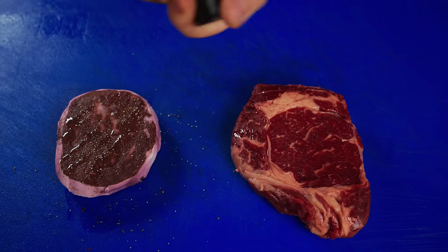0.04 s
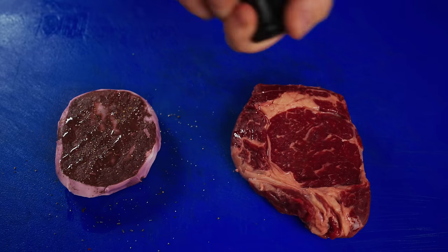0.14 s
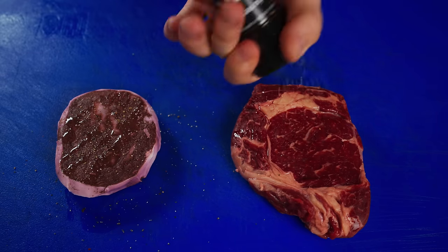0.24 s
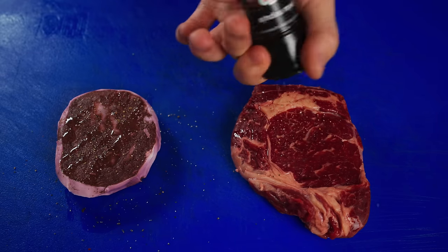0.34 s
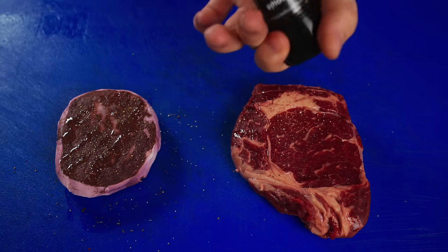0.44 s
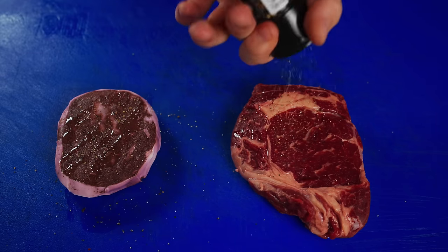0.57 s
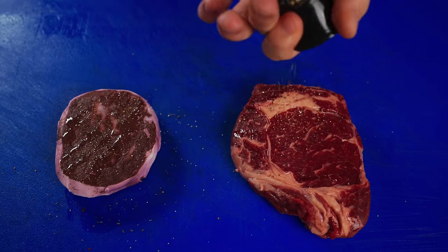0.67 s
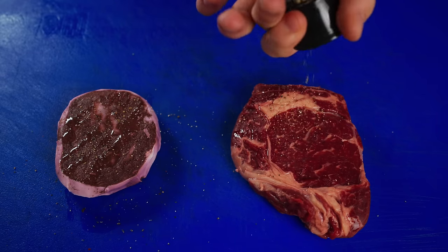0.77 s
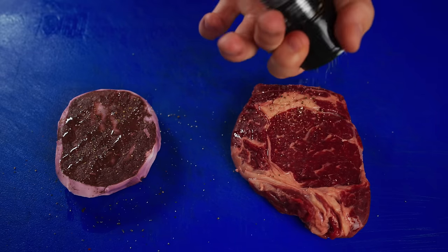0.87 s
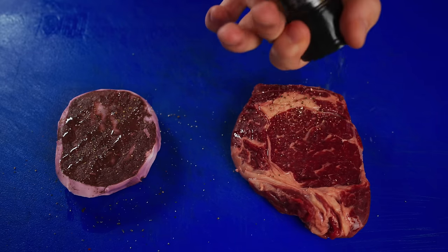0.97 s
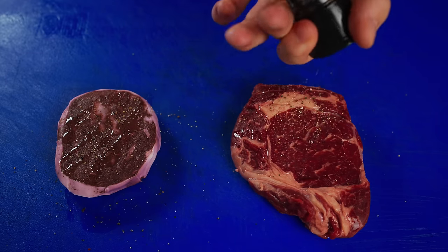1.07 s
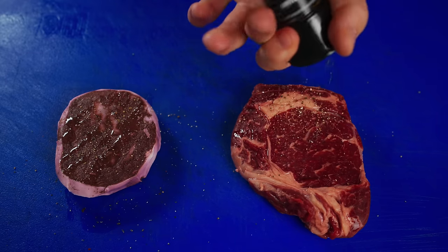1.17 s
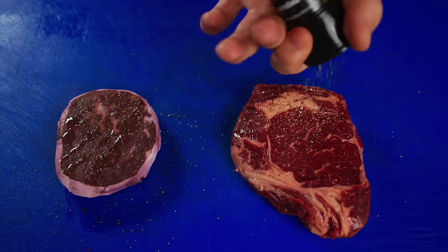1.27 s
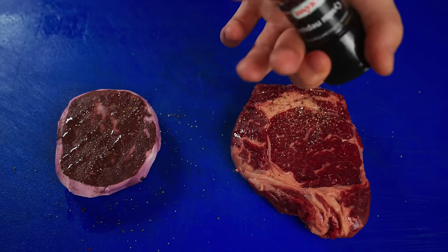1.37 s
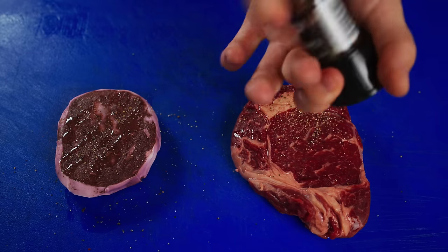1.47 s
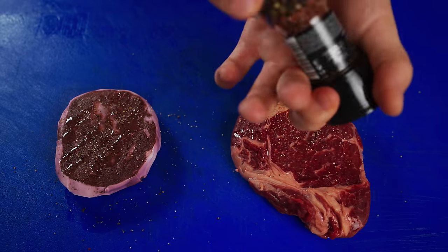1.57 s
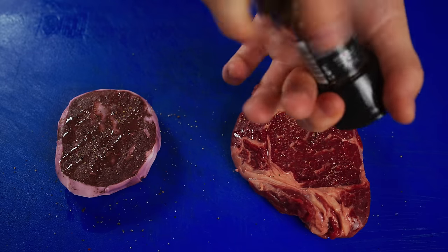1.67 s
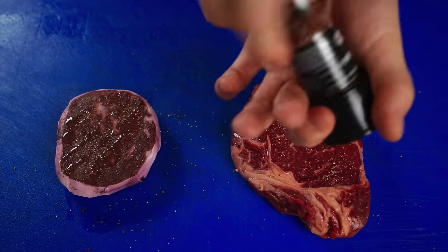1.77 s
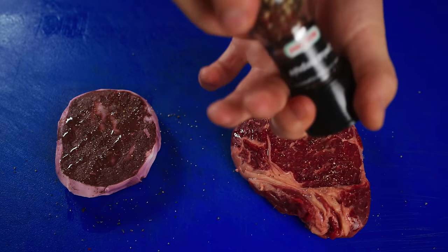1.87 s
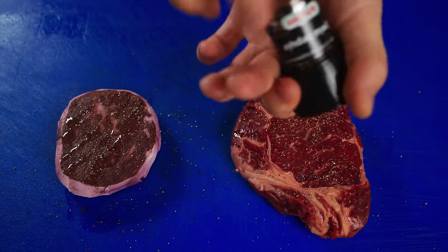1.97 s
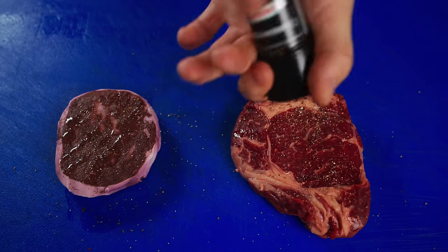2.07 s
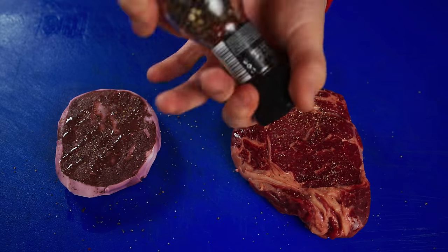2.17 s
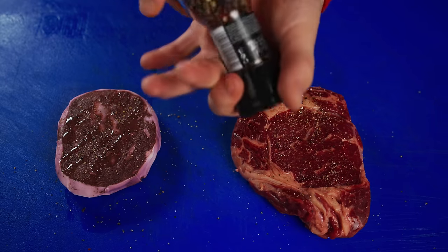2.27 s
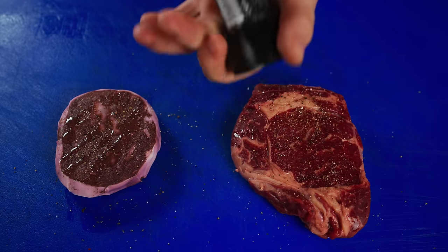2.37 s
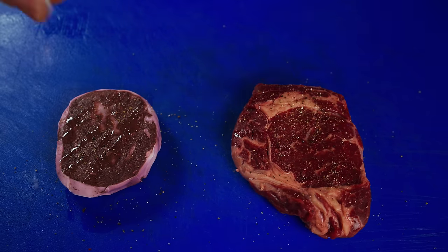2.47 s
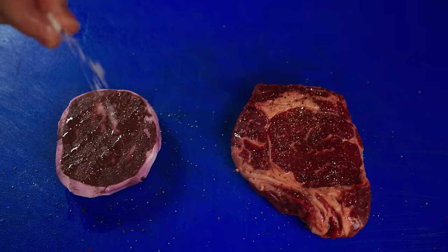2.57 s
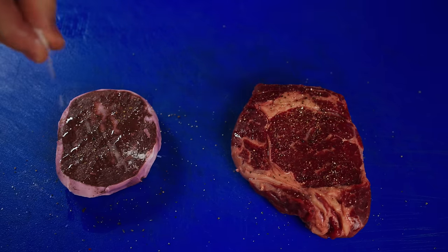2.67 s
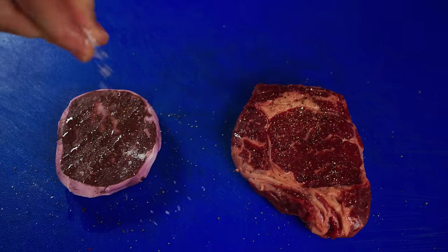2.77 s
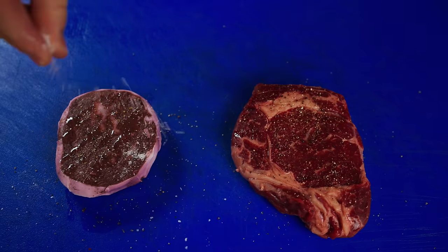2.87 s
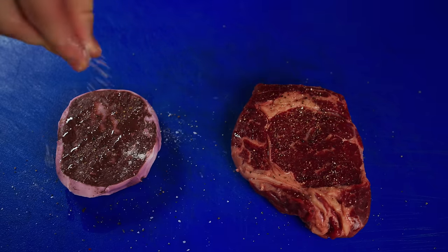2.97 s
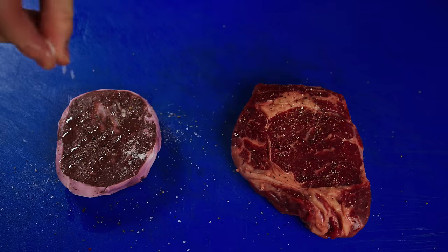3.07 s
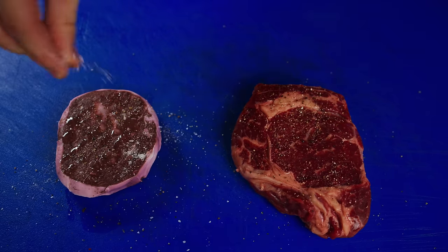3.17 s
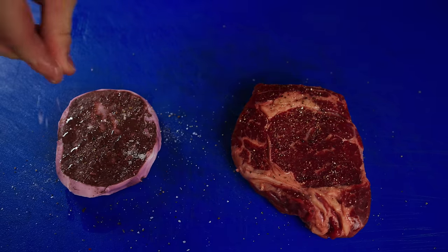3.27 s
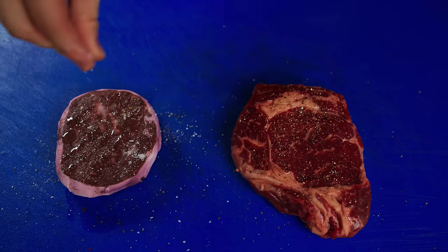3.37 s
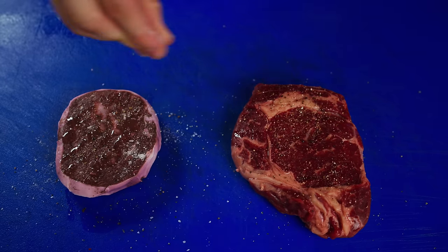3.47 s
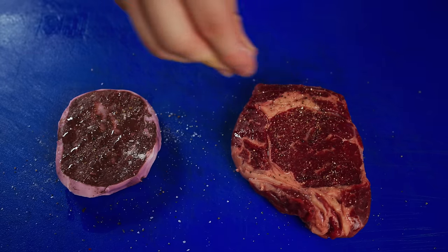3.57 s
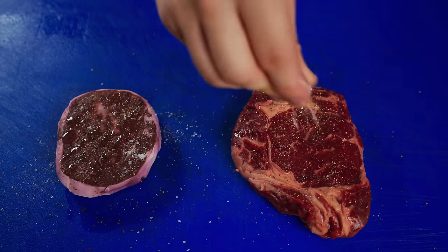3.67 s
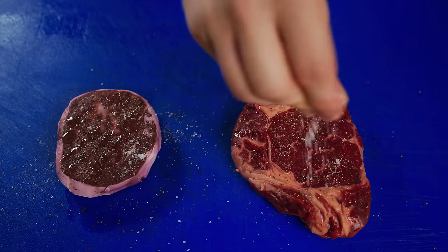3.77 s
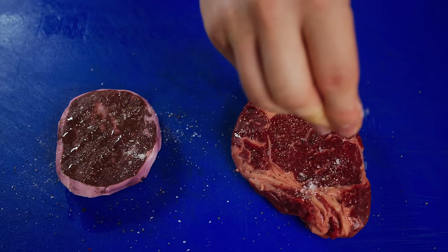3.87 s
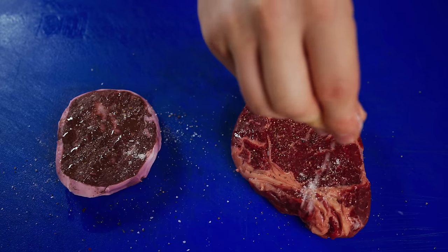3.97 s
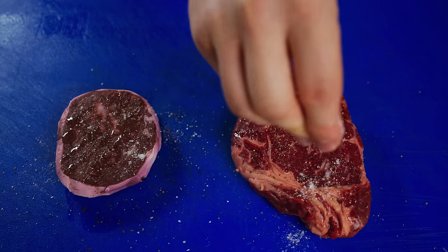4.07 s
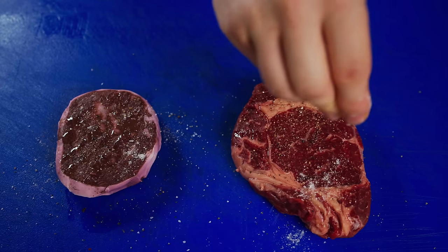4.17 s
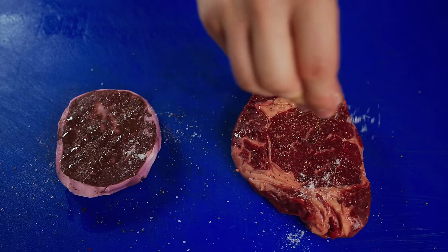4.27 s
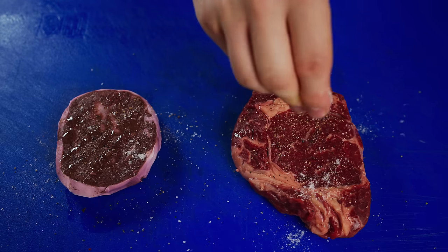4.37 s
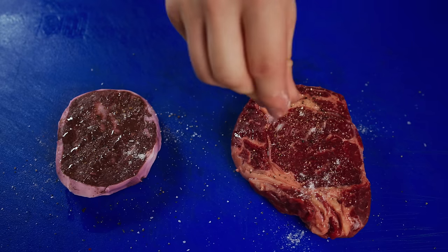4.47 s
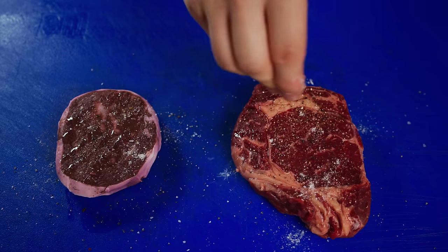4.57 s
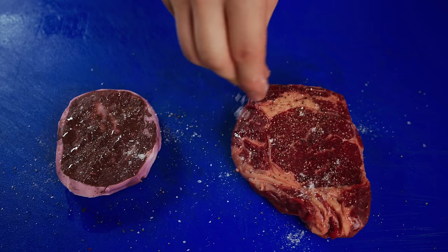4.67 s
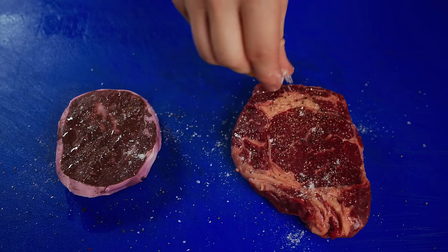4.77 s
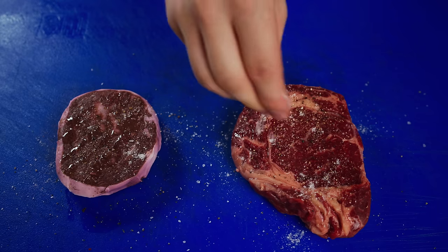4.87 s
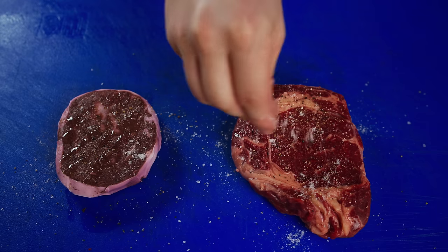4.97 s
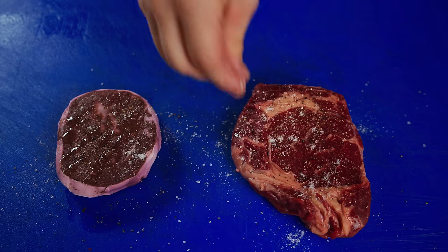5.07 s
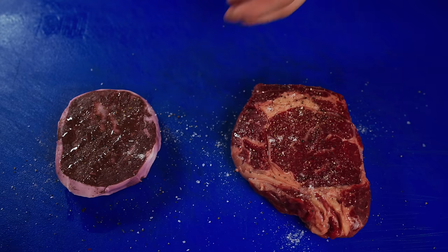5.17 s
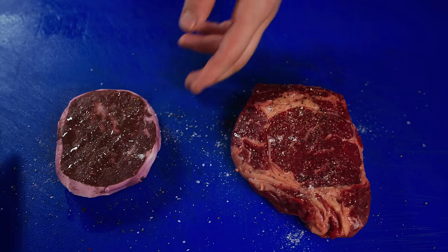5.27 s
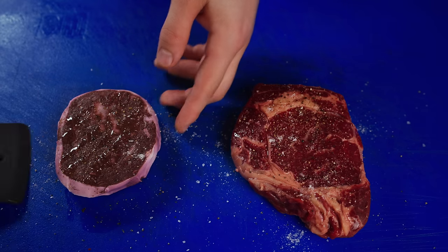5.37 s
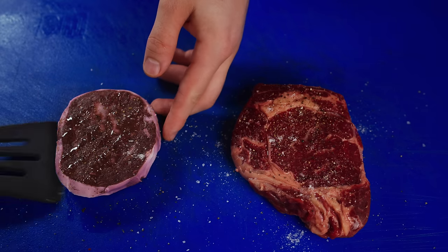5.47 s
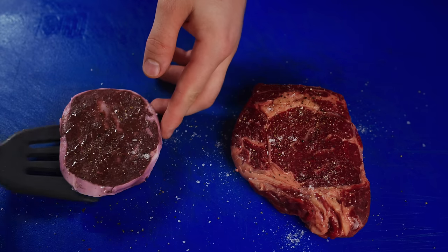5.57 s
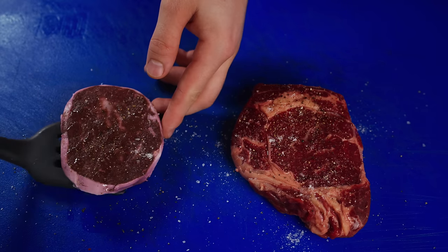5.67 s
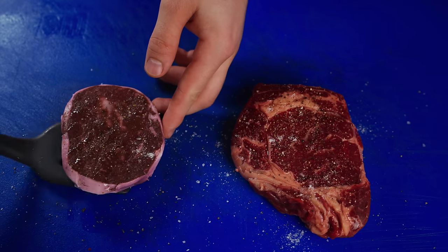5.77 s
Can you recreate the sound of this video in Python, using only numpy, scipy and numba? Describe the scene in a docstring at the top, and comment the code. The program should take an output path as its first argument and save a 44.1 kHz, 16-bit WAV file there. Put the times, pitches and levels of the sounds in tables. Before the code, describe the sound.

Near the microphone, a hand grinder crunches in seven even bursts, dry and bright with a hollow plastic ring and light jar rattle. The room tone then jumps up slightly, and salt whispers from rubbing fingers in irregular strokes, crystals ticking. A brief rasping spatula slide over a gritty board follows, with a short diffuse kitchen echo.

```python
"""A quiet kitchen, close to the worktop: a hand mill is twisted seven times over meat. Kernels crack in the burr
and ring its plastic body, modelled as noise bursts through resonances; loose ones tinkle in the jar.
After a cut to a louder room tone, fingers rub out a pinch of salt (wandering bands of noise) and grains tick
on the board. A spatula knocks the board and scrapes under a steak: random clicks through a gliding resonance.
The sources also reach the microphone by way of the kitchen's diffuse echo."""
import sys
import numpy as np
from scipy import signal
from scipy.fft import rfft, irfft
from scipy.io import wavfile
from scipy.ndimage import uniform_filter1d
from numba import njit

SR = 44100
rng = np.random.default_rng(int(sys.argv[2]) if len(sys.argv) > 2 else 0)


def waveform_to_disk(signal):
    """Save audio, clipped to [-1, 1], as 16-bit WAV at the path in sys.argv[1]."""
    frames = np.transpose(np.atleast_2d(signal))
    scaled = np.clip(frames, -1, 1) * 32767
    samples = np.round(scaled).astype(np.int16)
    wavfile.write(sys.argv[1], SR, samples)


def boost_factor(decibels):
    """Convert a level in decibels to a linear amplitude factor."""
    exponent = np.asarray(decibels, float) / 20
    return 10 ** exponent


N = 257103
T = np.arange(N) / SR  # s

# Kitchen hum before and after the cut. Each row: frequency in Hz, relative density in dB per Hz.
HUM_BEFORE = [(15, -30.5), (25, 6.5), (439, -7.5), (607, -4), (1130, -12.5), (1610, -18), (5570, -25.5),
              (9070, -21.5), (16000, -24)]
HUM_AFTER = [(15, -22), (30, 5), (65, -7.5), (110, -5), (190, -6.5), (370, -8.5), (460, -13), (730, -11.5),
             (1560, -19.5), (2100, -22), (9800, -28.5), (12200, -26.5), (16000, -29)]
# Faint low tones that come and go. Each row: start in s, end in s, start pitch in Hz, end pitch in Hz, level in dB.
TONES = [(0, 0.16, 440, 390, -73.5), (1.793, 1.946, 242, 245, -77.5), (2.095, 2.345, 242, 238, -75.5),
         (3.097, 3.338, 378, 366, -72), (3.28, 3.6, 345, 319, -71), (5.6, 5.74, 360, 345, -66)]
# The kitchen's echo. Each row: band centre in Hz, t60 in s, relative level in dB.
ROOM = [(293, 0.71, -11.5), (700, 0.41, -23), (1392, 0.41, -21.5), (3000, 0.39, -25), (5800, 0.33, -21.5),
        (12000, 0.12, -21)]

# Spatula sliding. Each row: time in s, blade level in dB, blade resonance in Hz.
SCRAPE = [(5.255, -83, 3600), (5.27, -59.5, 3590), (5.33, -62.5, 3500), (5.358, -51.5, 3400),
          (5.402, -52.5, 3740), (5.449, -37.5, 4070), (5.466, -35, 4140), (5.48, -47, 3770),
          (5.515, -37.5, 3700), (5.555, -40.5, 3250), (5.61, -37.5, 3380), (5.665, -54, 3130),
          (5.8, -90, 3330)]
# Sand under the blade. Each row: frequency in Hz, relative density in dB per Hz.
GRIT_COLOUR = [(2940, -19), (5000, -3.5), (5810, -5.5), (11800, -9.5), (15100, -11.5), (16000, -21)]
# Spatula meeting the board. Each row: time in s, height of the push in dB.
KNOCKS = [(5.264, -53), (5.51, -58)]
# Blade edge catching. Each row: time in s, level in dB.
SNAPS = [(5.501, -35.5)]
# Resonances of the board and of the blade edge. Each row: frequency in Hz, width in Hz, relative strength in dB.
BOARD = [(124.5, 25, -3.5), (340, 78, -9.5), (690, 250, -12.5), (1340, 240, -10)]
BLADE = [(1010, 720, -8), (2200, 6200, 12), (4200, 2500, -16), (9000, 8000, -26)]

# Strokes of thumb over finger. Each row: peak time in s, peak level in dB before the lumps, length in s.
STROKES = [(2.575, -61, 0.27), (2.669, -58, .07), (2.798, -61, 0.16), (2.892, -58.5, 0.079),
           (3, -55, 0.052), (3.041, -51, 0.044), (3.137, -56.5, 0.063), (3.551, -46.5, 0.048),
           (3.598, -50.5, 0.044), (3.702, -53.5, 0.15), (3.838, -50, 0.085), (3.953, -56.5, 0.12),
           (4.012, -60, 0.062), (4.095, -50, 0.088), (4.223, -51.5, 0.13), (4.333, -54, 0.097),
           (4.426, -49.5, 0.085), (4.512, -58.5, .05), (4.601, -48.5, 0.094), (4.757, -47, 0.084),
           (4.859, -46.5, 0.053), (4.948, -58, 0.16)]
# Salt trickling while a pinch is held. Each row: start in s, end in s, level in dB before the lumps.
PINCHES = [(2.51, 3.21, -65), (3.52, 5.026, -71)]
# Hiss of rubbed salt. Each row: frequency in Hz, relative density in dB per Hz.
RUB_COLOUR = [(1060, -16), (1800, -11.5), (3290, -3), (3710, 1.5), (5010, -5), (6900, -0.5), (8130, -5.5),
              (10300, -2), (11900, -2.5), (15100, -4), (16000, -16)]
# Salt grains that snap or land on the board. Each row: time in s, level in dB.
GRAINS = [(2.4789, -57), (2.5602, -39), (2.5792, -53.5), (2.8078, -48), (2.8948, -54.5), (3.0433, -41),
          (3.0537, -49), (3.1132, -49), (3.1541, -41.5), (3.5239, -50), (3.5969, -53), (3.701, -43),
          (3.7187, -47), (3.9021, -53), (4.094, -51), (4.2788, -49), (4.42, -47), (4.4382, -44.5),
          (4.489, -54), (5.3058, -53), (5.6303, -59), (5.6775, -59), (5.6978, -60), (5.8074, -58)]
# Resonances of a grain's tick. Each row: frequency in Hz, width in Hz, relative strength in dB.
GRAIN = [(3630, 1600, -5), (6800, 9200, -5), (12500, 4900, 2.5)]

# Loose kernels against the jar wall, and a thin high ring between twists. Each row: time in s, level in dB.
RATTLE = [(0.3256, -52), (0.3351, -54.5), (0.344, -51.5), (0.362, -58), (0.439, -57), (0.6383, -54),
          (0.648, -49.5), (0.674, -48.5), (0.686, -50), (0.6971, -52), (1.2936, -53), (1.3205, -56.5),
          (1.331, -58), (1.3647, -53), (1.3801, -50), (1.3907, -57), (1.674, -54.5), (1.685, -54),
          (1.9466, -58.5), (1.9574, -60), (2.0164, -58), (2.0262, -63), (2.125, -49), (2.2072, -52.5),
          (2.2193, -60), (2.2382, -58)]
TINKS = [(.224, -50), (.241, -53), (.26, -57), (.575, -62), (.645, -60), (.94, -60), (1.225, -62),
         (1.405, -62), (1.29, -58.5), (1.315, -61.5), (1.648, -64.5), (1.932, -61), (2.208, -63)]
# Resonances of the jar and of the thin ring. Each row: frequency in Hz, width in Hz, relative strength in dB.
JAR = [(9000, 330, 2), (9720, 400, -10.5), (10100, 500, -12), (11100, 500, -16.5)]
TINK = [(13430, 55, 0)]
# Palm sliding on the jar. Each row: frequency in Hz, relative density in dB per Hz.
GRIP = [(300, -29.5), (1500, -4), (4000, -4.5), (16000, -16)]

# Twists of the mill. Each row: start in s, end in s, crunch in dB before each part's share, peak worktop
# rumble in dB, change in dB that the grip makes to the body's ring.
TWISTS = [(0.134, 0.203, -28, -62.5, 0.5), (.47, 0.535, -29, -59, 0.5), (0.786, 0.889, -35, -60, -1.5),
          (1.109, 1.205, -33.5, -60.5, -0.5), (1.423, 1.515, -31, -57, 0), (1.731, 1.805, -32.5, -56, -0.1),
          (2.04, 2.122, -32.5, -59, 1)]
# Kernels that crack clearly. Each row: time in s, level in dB before each part's share, place (-1 cap, 0 body, 1 burr).
CRACKS = [(0.1275, -30.0, 0.21), (0.14, -24.5, 0.067), (0.1463, -24.5, 0.53), (0.1508, -23, 0.018),
          (0.154, -22.5, 0.029), (0.1617, -17, -0.079), (0.1732, -27, 0.31), (0.179, -26, 0.64),
          (0.1936, -24.0, 0.77), (0.465, -42, 0.55), (0.469, -28, 0.13), (0.4722, -23, 0.0051),
          (0.479, -29, 0.13), (0.4854, -22.5, -0.22), (0.4896, -23.0, 0.29), (0.4951, -23, 0.1),
          (0.4995, -23.5, -0.08), (0.5122, -29, 0.43), (0.5225, -23.5, 0.044), (0.7902, -21.5, 0.45),
          (0.8049, -23, 0.19), (0.821, -29.5, 0.13), (0.8354, -26, 0.41), (0.8507, -24.5, -0.32),
          (0.8638, -27.0, 0.62), (0.8721, -39, 0.47), (0.8784, -39, 0.31), (0.9588, -38.5, 0.68),
          (1.112, -39, -0.17), (1.1146, -22, 0.1), (1.1229, -23.0, 0.61), (1.1289, -23, 0.75),
          (1.1438, -21, -0.14), (1.149, -24, 0.11), (1.1558, -31, 0.35), (1.1635, -22.5, 0.27),
          (1.189, -31, 0.56), (1.1932, -31, 0.46), (1.41, -52.5, 0.6), (1.421, -29.5, 0.8),
          (1.4244, -24.5, -0.56), (1.4367, -24, -0.35), (1.4422, -24.0, 0.0097), (1.4492, -22.5, 0.76),
          (1.4557, -26.5, 0.4), (1.4596, -26.5, 0.16), (1.4675, -22, 0.2), (1.4726, -25, -0.04),
          (1.482, -29.5, 0.077), (1.4871, -24.5, 0.35), (1.504, -33, 0.31), (1.51, -27.5, 0.3),
          (1.5201, -37.5, 0.31), (1.72, -38.5, -0.62), (1.7361, -23, 0.13), (1.7435, -30.5, 0.053),
          (1.748, -29, 0.19), (1.766, -27, -0.017), (1.7704, -23.5, 0.02), (1.7765, -29.0, -0.012),
          (1.782, -28.5, -0.15), (1.8039, -34.0, 0.33), (1.8175, -30.5, 0.48), (1.9012, -49.5, -1.1),
          (2.0402, -32, 0.028), (2.0492, -31.5, -0.32), (2.056, -24.5, -0.33), (2.0646, -21, -0.067),
          (2.0702, -25.5, -0.041), (2.0818, -22.5, 0.37), (2.086, -24.5, -0.21), (2.1001, -28.0, 0.23),
          (2.104, -29.5, -0.063), (2.1173, -29.0, -0.45)]
# Resonances of the mill's parts. Each row: frequency in Hz, width in Hz, relative strength in dB.
CAP = [(294, 660, -32.5), (480, 68, -31.5), (635, 150, -19), (1147, 226.5, 0.5), (1280, 181.7, 4.5),
       (2060, 456, -4.5)]
BODY = [(2600, 1830, -11.5), (3243, 190, 3), (3700, 580, -1.5), (4340, 1090, -6)]
BURR = [(5740, 1100, -1.5), (7770, 700, 2), (9530, 1540, 0.5), (11420, 3200, -3.5), (15240, 2000, -2.5),
        (15600, 1200, -3.5)]
# Share of a crack that each part takes when the crack is at its place: cap, body, burr in dB.
PART_DB = (-2.5, -3, 1.5)
# Worktop shaking under the arm. Each row: frequency in Hz, relative density in dB per Hz.
RUMBLE = [(12, -18.5), (30, -1.5), (70, -3.5), (130, -15), (250, -37.5)]


def curve(rows, quiet_db=-100):
    """Columns of a table over time, held at quiet_db outside it."""
    s, *columns = np.transpose(rows)
    return [np.interp(T, s, c, quiet_db, quiet_db) for c in columns]


def walk(per_s):
    """Slow random wander, spread near 1."""
    k = int(SR / per_s)
    steps = np.repeat(rng.standard_normal(N // k + 1), k)
    return 1.3 * uniform_filter1d(uniform_filter1d(steps, k), k)[:N]


def noise(colour):
    """Noise of rms 1 with the given spectrum."""
    hz, db = np.transpose(colour)
    f = np.maximum(np.arange(N // 2 + 1) * SR / N, 1)
    gain = boost_factor(np.interp(np.log(f), np.log(hz), db))
    x = irfft(rfft(rng.standard_normal(N)) * gain, N)
    return x / x.std()


def grit(per_s, spread_db, smear_ms):
    """Dense random clicks of uneven size, each smeared into a short decay of noise; rms 1."""
    size = (rng.random(N) < per_s / SR) * boost_factor(spread_db * rng.exponential(1, N))
    smear = signal.lfilter([1], [1, -np.exp(-1 / (smear_ms * SR / 1000))], size)
    x = smear * rng.standard_normal(N)
    return x / x.std()


@njit
def svf(x, hz, width):
    """Band-pass with a moving centre, gain 1 there."""
    y, b, l = np.empty(len(x)), 0., 0.
    for i in range(len(x)):
        g, k = np.tan(np.pi * hz[i] / SR), width / hz[i]
        v = (b + g * (x[i] - l)) / (1 + g * (g + k))
        b, l, y[i] = 2 * v - b, l + 2 * g * v, k * v
    return y


def response(modes):
    """Ring of a set of resonances after one click, with unit energy: wider ones die sooner."""
    t = np.arange(SR // 16) / SR
    h = 0
    for k, (hz, width, db) in enumerate(modes):
        decay = np.exp(-np.pi * width * t)
        h = h + (-1) ** k * boost_factor(db) * width * decay * np.sin(2 * np.pi * hz * t)
    # thin out what lies below the lowest resonance
    h = signal.sosfilt(signal.butter(2, .6 * modes[0][0], "high", fs=SR, output="sos"), h)
    return h / np.sqrt(np.sum(h ** 2))


def ring(x, modes):
    """Sound of x through the resonances."""
    return signal.fftconvolve(x, response(modes))[:N]


def hits(times, dbs, modes, decay_ms, heard_ms, scatter=.3):
    """A short noise burst rings the modes; each hit has the energy of its level held for heard_ms."""
    # every hit lands elsewhere: spread of pitch (share) and strength at scatter 1
    detune, tint_db = 0.029, 3.0
    t = np.arange(400) / SR * 1000  # ms
    bursts = rng.standard_normal((len(times), 400)) * np.exp(-t / decay_ms) * np.minimum(t / (0.26 * decay_ms), 1)
    chance = scatter * rng.standard_normal((len(times), len(modes), 2))
    x = np.zeros(N + SR)
    for s, db, burst, c in zip(times, dbs, bursts, chance):
        struck = [(hz + detune * min(hz, 10 * width) * a, width, m + tint_db * b)
                  for (hz, width, m), (a, b) in zip(modes, c)]
        sound = signal.fftconvolve(burst, response(struck))
        level = boost_factor(db) * np.sqrt(heard_ms * SR / 1000 / np.sum(sound ** 2))
        x[int(s * SR):][:len(sound)] += level * sound
    return x[:N]


def hum():
    """Room tone as coloured noise, louder after the cut, with a few faint tones of wavering pitch."""
    cut_s, before_db, after_db = 2.505, -75, -62.5
    out = np.where(T < cut_s, boost_factor(before_db) * noise(HUM_BEFORE), boost_factor(after_db) * noise(HUM_AFTER))
    for a, b, hz0, hz1, db in TONES:
        swell = np.sin(np.pi * np.clip((T - a) / (b - a), 0, 1)) ** .5
        hz = np.interp(T, [a, b], [hz0, hz1]) * (1 + 0.011 * walk(40))
        out = out + boost_factor(db) * np.sqrt(2) * swell * np.sin(2 * np.pi * np.cumsum(hz) / SR)
    return out


def room(x):
    """Diffuse echo of the kitchen: bands of noise about an octave wide, each dying at its own rate."""
    t, h = np.arange(int(.8 * SR)) / SR, 0
    for hz, t60, db in ROOM:
        band = svf(rng.standard_normal(len(t)), np.full(len(t), 1. * hz), 1.1 * hz)
        band = band * 1000. ** (-t / t60)
        h = h + boost_factor(db) * band * np.sqrt(hz / SR / np.sum(band ** 2))
    h *= np.clip(t / 0.003, 0, 1)  # the echo builds over 3 ms
    return 2.73 * signal.fftconvolve(x, h)[:N]


def spatula():
    """The blade chatters over board and salt; its resonance shifts as the meat loads it."""
    loaded_s, muffle_db, board_muffle_db = 5.54, -10.5, -2.5
    sand_db, drone_db = -9, -7.5
    drone_slope = 0.53  # the board grows more slowly than the blade: dB per dB about -50 dB
    blade_db, hz = curve(SCRAPE)
    loaded = np.interp(T, [loaded_s - .02, loaded_s + 0.014], [0, 1])
    grit_db = blade_db + sand_db + muffle_db * loaded
    drone = -50 + drone_slope * (blade_db + 50) + drone_db + board_muffle_db * loaded
    board_db = np.where(blade_db > -99, drone, blade_db)

    chatter, scuff = (grit(9000, spread_db=0.2, smear_ms=0.89) for _ in range(2))
    hz = np.clip(hz, 2000, 6000)
    low_hz = np.full(N, 2200.)
    gliding = svf(svf(chatter, hz, 1300.), hz, 1300.)
    blade = gliding + .55 * svf(svf(scuff, low_hz, 1100.), low_hz, 1100.)
    sand = noise(GRIT_COLOUR) * (0.76 + .5 * uniform_filter1d(np.abs(chatter), size=30))
    knock = np.zeros(N)
    for s, db in KNOCKS:
        knock[int(s * SR):][:150] = boost_factor(db) * np.hanning(150)  # a soft push
    board = ring(boost_factor(board_db) * chatter + knock, BOARD)
    snap = hits(*np.transpose(SNAPS), BLADE, 0.11, heard_ms=1.5)
    return boost_factor(blade_db) * blade / blade.std() + boost_factor(grit_db) * sand + board + snap


def rubbing():
    """Each stroke swells slowly and stops faster, over the trickle of a held pinch; powers add."""
    swell_share, edge_db = 0.57, -14.5  # share of the length spent swelling; drop at both ends
    power = 0
    for a, b, db in PINCHES:
        held = np.interp(T, [a - .01, a + .01, b - .03, b + 0.034], [0, 1, 1, 0])
        power = power + boost_factor(db) * held
    power = power ** 2
    for s, db, length in STROKES:
        away = (T - s) / (length * np.where(T < s, swell_share, 1 - swell_share))
        power = power + boost_factor(db + edge_db * np.abs(away) ** 1.6) ** 2
    return np.sqrt(power)


def salt():
    """Crystals grind between finger and thumb as lumpy hiss; single ones snap or land."""
    lumpy = uniform_filter1d(np.abs(grit(410, spread_db=1.0, smear_ms=1.0)), size=30)
    hiss = noise(RUB_COLOUR)
    low, low_mid = (signal.sosfiltfilt(signal.butter(3, hz, fs=SR, output="sos"), hiss) for hz in (5200, 8500))
    # the hollow between the fingers changes shape, so the three bands wander apart
    shifting = sum(band * boost_factor(1.5 * walk(8)) for band in (low, low_mid - low, hiss - low_mid))
    rubbed = rubbing() * shifting * (0.55 + 0.47 * lumpy)
    return rubbed + hits(*np.transpose(GRAINS), GRAIN, 0.9, heard_ms=1.76)


def jar():
    """Kernels tumble back and tap the wall, loud taps over a patter of small ones; the palm slides on the jar."""
    tumble_s, tumble_db = 0.13, -66  # kernels slide as the jar turns back, this long before the next twist
    handled = np.interp(T, [.1, .2, 2.2, 2.32], [0, 1, 1, 0])
    tumbling = sum(np.interp(T, [a - tumble_s, a - tumble_s + .02, a], [1e-3, 1, .5], 0, 0)
                   for a, *_ in TWISTS[1:])
    taps = ring(grit(200, spread_db=5.0, smear_ms=2.), JAR)
    patter = (boost_factor(-76) + boost_factor(tumble_db) * tumbling) * taps
    palm = boost_factor(-70.0 + 2.9 * walk(25)) * noise(GRIP)
    rattle = hits(*np.transpose(RATTLE), JAR, 4.8, heard_ms=5.0)
    tinkle = hits(*np.transpose(TINKS), TINK, 4., heard_ms=12)
    return handled * (patter + palm) + rattle + tinkle


def worktop():
    """The arm's effort shakes the worktop: low noise that builds and fades within each twist."""
    peak_share, rise_db_s, fall_db_s = 0.49, 122, 198  # peak as a share of the twist; slopes in dB per s
    shake = 0
    for a, b, _, rumble_db, _ in TWISTS:
        t = T - a - peak_share * (b - a)
        shake = shake + boost_factor(rumble_db + np.minimum(rise_db_s * t, -fall_db_s * t))
    return shake * noise(RUMBLE)


def mill():
    """Clear cracks over a crunch of small ones; each excites cap, body and burr in its own share."""
    place_loss_db, crack_scatter_db = -6.5, 0.5  # loss per squared step of place; random spread
    # a faint crunch leads in as the slack is taken up
    turning = 0
    for a, b, db, *_ in TWISTS:
        effort = np.interp(T, [a - .014, a, a + 0.0033, b - .012, b], [0.00053, 0.087, 0.98, 0.7, 0.00037])
        turning = turning + boost_factor(db) * effort
    s, crack_db, place = np.transpose(CRACKS)
    chance = rng.standard_normal((len(s), 3))
    # each grip lasts until 0.1 s after its twist
    ends = np.array(TWISTS)[:, 1]
    twist = np.minimum(np.searchsorted(ends + .1, T), len(ends) - 1)
    grip_db = np.array(TWISTS)[twist, -1]
    out = 0
    for k, (modes, crunch_db, decay_ms) in enumerate(((CAP, -7, 1.2), (BODY, -1, 1.3), (BURR, -1, 1.1))):
        db = crack_db + PART_DB[k] + place_loss_db * (place - (k - 1)) ** 2 + crack_scatter_db * chance[:, k]
        crunch = boost_factor(crunch_db) * turning * grit(1800, spread_db=-1.0, smear_ms=0.97)
        cracks = hits(s, db, modes, decay_ms, heard_ms=3.33, scatter=.2 if modes is CAP else 1)
        part = cracks + ring(crunch, modes)
        out = out + (boost_factor(grip_db) * part if modes is BODY else part)
    return out + worktop()


def scene():
    """Close sources, their echo and the room tone."""
    near = mill() + jar() + salt() + spatula()
    return (near + room(near) + hum())[None]


def band_limit(x):
    """A steep low-pass at the top of the band."""
    return signal.sosfilt(signal.butter(12, 16960, fs=SR, output="sos"), x)


def record(dry):
    """The input rounds the sharpest cracks; the top is cut steeply above 15.85 kHz."""
    rounded = .3 * np.tanh(dry / .3)
    mix = signal.sosfilt(signal.ellip(8, .2, 24, 15850, fs=SR, output="sos"), rounded)
    return band_limit(mix)


dry = scene()
out = record(dry)
waveform_to_disk(out)
```